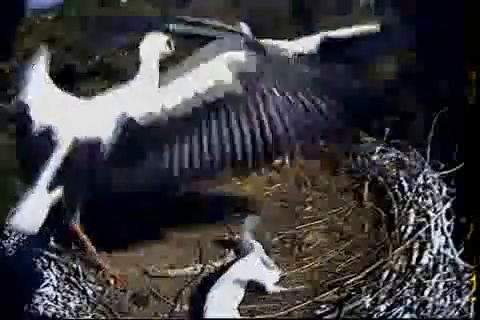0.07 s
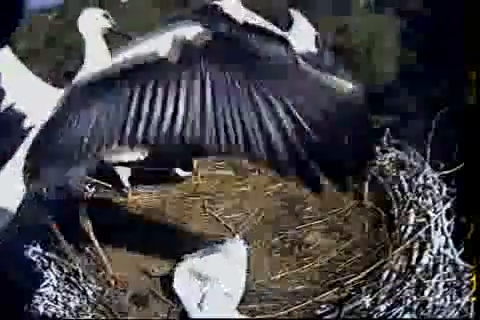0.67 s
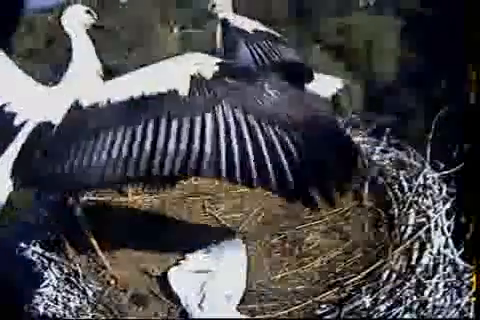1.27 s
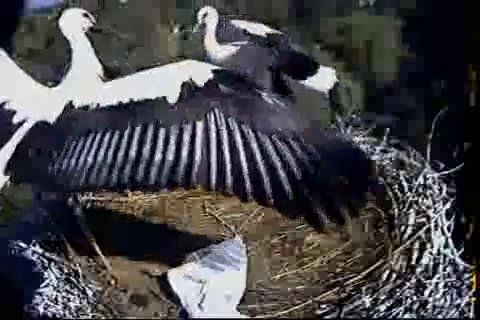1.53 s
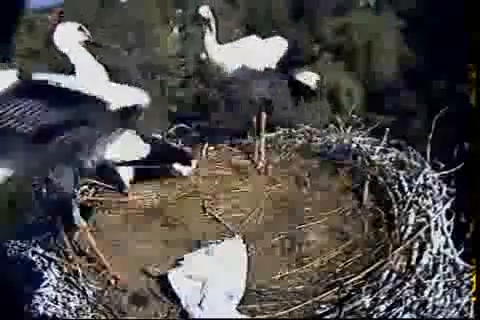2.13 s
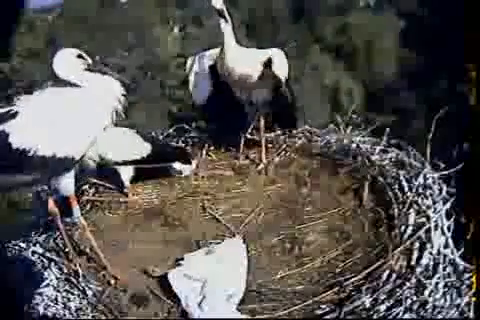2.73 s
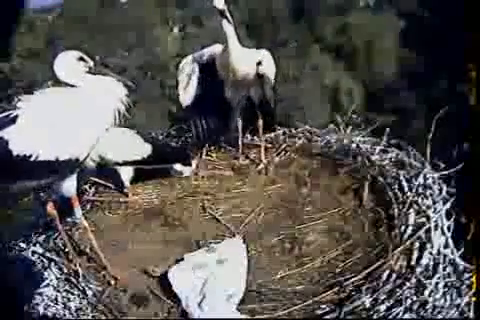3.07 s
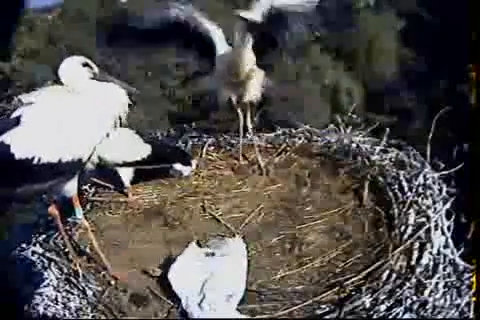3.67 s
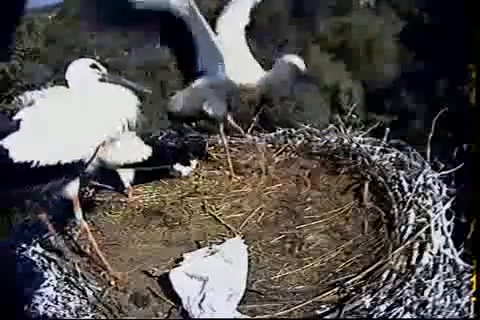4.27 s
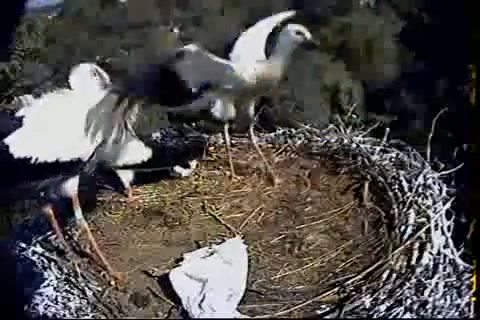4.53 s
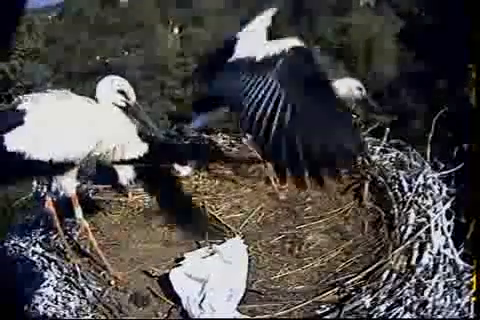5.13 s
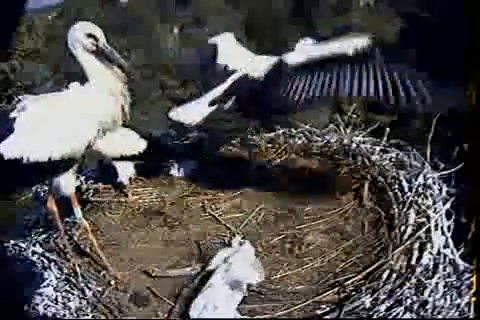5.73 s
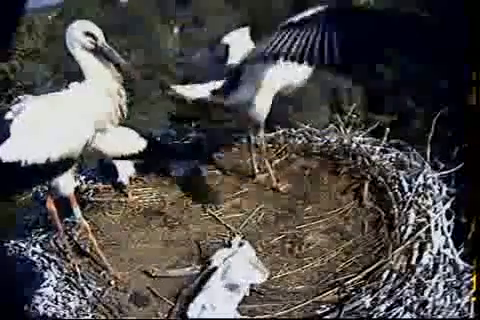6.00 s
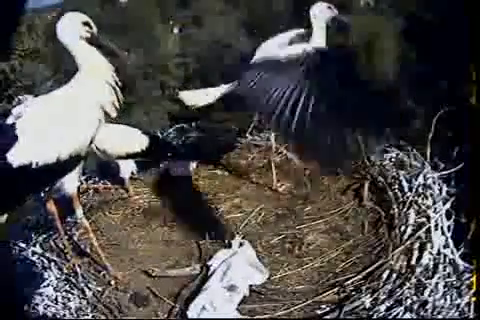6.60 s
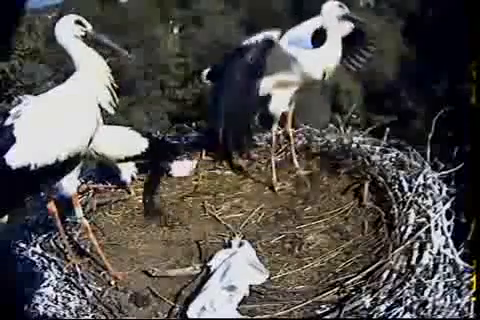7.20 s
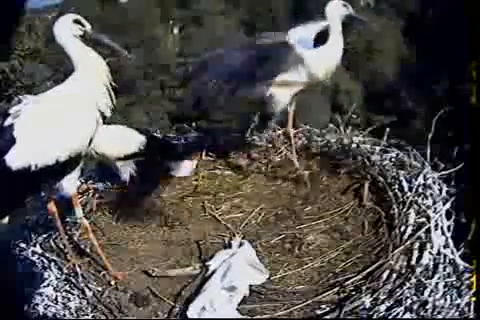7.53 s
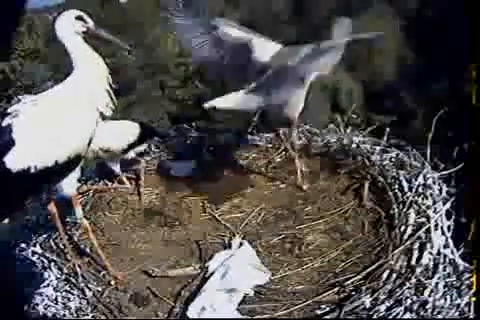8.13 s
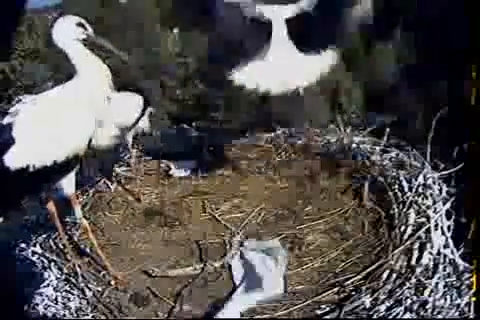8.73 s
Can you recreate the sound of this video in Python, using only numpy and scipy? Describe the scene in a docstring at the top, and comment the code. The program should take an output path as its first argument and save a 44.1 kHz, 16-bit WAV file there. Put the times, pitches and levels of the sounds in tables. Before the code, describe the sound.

Young storks beat their wings in a high twig nest, close to a small microphone. The draught buffets it with low, fluttering thumps, strongest in the first second, then eases to lighter gusts with faint feather swishes. From about 3.6 to 5.2 seconds a bill snaps nine times at an uneven pace, each a loud, hard crack with a short, hollow ring. A brief, soft, hollow rustle falls between the first two snaps. The wing gusts grow again from 5 to about 6.8 seconds, and return more lightly near the end. A foot briefly scrapes the twigs at 8.1 seconds, a dry stick ticks at 8.4, and another tiny hollow rustle comes at 8.7. Soft wind in the trees, a distant low roar and steady microphone hiss lie behind throughout, with a very faint, far-off hum rising around 4 to 6 seconds.

```python
"""A high twig nest, where young storks exercise their wings close to a small fixed microphone.
The draught of the wing beats buffets the microphone, among feather swishes and airy rushes.
A bill snaps nine times, each a hard crack with a short ring of horn and hollow.
Two short, hollow rustles sound, a foot scrapes the twigs, and a stick ticks.
Wind in the trees and a distant low roar with a faint drone lie behind, over the microphone's own hiss."""
import sys
import numpy as np
from scipy import signal
from scipy.fft import rfft, irfft
from scipy.io import wavfile
from scipy.ndimage import uniform_filter1d

SR = 44100
rng = np.random.default_rng(int(sys.argv[2]) if len(sys.argv) > 2 else 0)


def pcm_store(signal):
    """Save signal as 16-bit PCM."""
    levels = np.round(np.clip(np.atleast_2d(signal), -1, 1) * 32767)
    wavfile.write(sys.argv[1], SR, levels.astype(np.int16).T)


N = 386757
TIME = np.arange(N) / SR


def buffeting():
    """Eddies push on the microphone as hard as the draught blows; a big vortex rocks it briefly."""
    # spectrum of the rumble: freq_hz, density_db
    rumble_colour = [(18, -28), (26, -9.5), (36, 1.5), (50, 0.5), (75, -2), (100, -9.5), (135, -15.5),
                     (190, -26.5), (330, -34.5)]
    # single big vortices shed by a wing: centre_s, level_db, rocking_hz
    vortices = [(0.057, -16, 34.2), (.322, -13.5, 57), (0.371, -19, 43.4), (0.596, -15.5, 42.3),
                (0.698, -17, 76.4), (4.984, -21, 36.8), (5.697, -25, 35), (5.811, -26, 38.5),
                (8.479, -28.5, 41.5), (8.584, -39, 54.3)]
    out = draught() * from_db(0.9 * drift(per_s=17)) * evened(coloured_noise(rumble_colour))
    for centre_s, level_db, rocking_hz in vortices:
        cycles = (TIME - centre_s) * rocking_hz
        out += from_db(level_db) * np.exp(-(cycles / 1.2) ** 2) * np.sin(2 * np.pi * cycles)
    return out


def draught():
    """Strength of the moving air: gusts add their power to a slowly slackening breeze."""
    # wing strokes and air reaching the microphone: centre_s, level_db, half_length_s
    gusts = [(0.06, -28.5, 0.043), (.12, -31, .02), (0.178, -24, 0.028), (0.25, -21, 0.031),
             (0.333, -19, 0.021), (0.37, -20, 0.02), (0.44, -24.5, 0.038), (0.533, -21.5, 0.023),
             (0.594, -25, 0.012), (0.647, -29.5, 0.027), (0.703, -22, 0.021), (0.767, -26.5, 0.036),
             (0.886, -28.5, 0.026), (1.01, -38.5, 0.04), (1.13, -36.5, 0.022), (1.41, -38, 0.061),
             (1.767, -39.5, 0.047), (1.938, -35, 0.021), (2.06, -37, .03), (2.17, -35, .03),
             (2.285, -38.5, 0.033), (2.715, -35.5, 0.1), (3.054, -38, 0.068), (3.183, -33, 0.026),
             (3.873, -34.5, 0.027), (4.154, -38, 0.13), (4.35, -33.5, 0.096), (4.985, -31, 0.042),
             (5.095, -34.5, 0.044), (5.22, -32, 0.061), (5.32, -30, 0.039), (5.434, -30, 0.039),
             (5.546, -30.5, 0.044), (5.748, -35.5, 0.07), (5.955, -32.5, 0.046), (6.226, -41, 0.058),
             (6.379, -26.5, 0.027), (6.66, -31, 0.074), (6.8, -34.5, 0.03), (7.045, -36, 0.029),
             (7.56, -41, 0.11), (7.867, -36.5, 0.026), (8.297, -37.5, 0.091), (8.487, -41, 0.023),
             (8.61, -35, 0.084)]
    breeze = from_db(-40.5 - 0.24 * TIME)
    gust_power = sum((from_db(db) * swell(s, half_length)) ** 2 for s, db, half_length in gusts)
    return np.sqrt(breeze ** 2 + gust_power)


def wing_flutters():
    """Small quick eddies off the wing tips flap at the microphone, pitched above the rumble."""
    # flurries of eddies: centre_s, level_db, half_length_s
    flurries = [(.38, -28.5, 0.018), (.6, -35, 0.028), (0.69, -32, 0.026), (3.07, -41.5, .04),
                (4.357, -50, .04), (4.99, -39, .025), (5.503, -39, 0.046), (5.69, -39, 0.016),
                (6.08, -39, 0.045), (6.38, -38, 0.022), (6.75, -46, 0.083), (7.332, -48, 0.052),
                (8.597, -38.5, 0.036)]
    flutter_hz = 115.3
    eddies = evened(band(band(rng.standard_normal(N), flutter_hz, q=2.3), flutter_hz, q=2.3))
    return eddies * sum(from_db(db) * swell(s, half_length) for s, db, half_length in flurries)


def bill_snaps():
    """The mandibles clap; the crack runs along the bill and back, and horn and hollow ring briefly."""
    # claps of the bill: start_s, level_db, crack_hz, cavity_hz, cavity_db, cavity_t60_s, echo_db,
    # flex_hz, flex_db, horn_db, tip_hz, tip_db (the parts' levels are relative to level_db)
    snaps = [(3.6016, -11.5, 2290, 626, -14, 0.035, -27, 1820, -22, -15, 2870, -32),
             (3.7082, -9.5, 2300, 614, -13.5, 0.028, -14, 1690, -22, -8, 2340, -30),
             (4.054, -11, 2430, 658, -9, 0.02, -7, 1620, -13.5, 7.5, 2950, -18),
             (4.21, -11.5, 2430, 675, -11.5, 0.022, -25, 1610, -14.5, 2, 2540, -19),
             (4.3259, -17, 2370, 714, -12, 0.026, -18, 1620, -24, -12, 2710, -25),
             (4.6172, -12, 2650, 694, -10.5, 0.016, -24, 1720, -30, 2, 2100, -31),
             (4.7535, -8.5, 2700, 704, -10.5, 0.011, -26, 1700, -30, -11, 2380, -29),
             (4.8606, -8, 3020, 686, -9.5, 0.0085, -20, 1720, -21, 2, 3700, -27),
             (5.1577, -12, 3020, 740, -10, 0.0096, -14, 1740, -25, 1, 2750, -26)]
    # overtones of the horny mandibles: ratio to flex_hz, level_db, t60_s
    horn_modes = [(1.36, -31, 0.015), (1.72, -21, 0.0069), (2.11, -26, 0.017), (2.9, -45, .008)]
    ratio, mode_db, mode_t60_s = np.transpose(horn_modes)[:, :, None]
    flex_t60_s, tip_t60_s, wash_t60_s = 0.025, 0.018, 0.2
    radiation = signal.butter(2, 450, "high", fs=SR, output="sos")  # a slim body radiates little bass
    out, t = np.zeros(N), TIME[:SR // 10]
    for (start_s, level_db, crack_hz, cavity_hz, cavity_db, cavity_t60_s, echo_db,
         flex_hz, flex_db, horn_db, tip_hz, tip_db) in snaps:
        crack = 0.79 * contact(t, crack_hz, q=0.82, scatter=0.053, scatter_t60_s=0.028)
        round_trip_s = 0.94 / cavity_hz
        echo = from_db(echo_db) * np.interp(t - round_trip_s, t, soften(crack, hz=4500), left=0)
        cavity = ringing(t, cavity_hz, cavity_db, cavity_t60_s)
        flex = ringing(t, flex_hz, flex_db, flex_t60_s)  # the mandibles' slowest bending mode
        tip = ringing(t, tip_hz, tip_db, tip_t60_s)  # the free end, tuned by the point of contact
        # every snap lands a little differently along the bill
        detune, accent = rng.standard_normal((2, len(horn_modes), 1))
        horn_hz = flex_hz * ratio * (1 + 0.0083 * detune)
        horn = ringing(t, horn_hz, mode_db + horn_db + 1.2 * accent, mode_t60_s).sum(axis=0)
        ring = soften(signal.sosfilt(radiation, cavity + flex + tip + horn), hz=5150)
        # a faint wash comes back from the surroundings
        wash = rms_one(band(rng.standard_normal(len(t)), hz=3040, q=0.3))
        wash *= from_db(-34.5 - 60 * t / wash_t60_s)
        add(out, start_s, -from_db(level_db) * (crack + echo + ring + wash))
    return out


def swishes():
    """Soft swells of friction noise: feather swishes, airy rushes and a faint twig rustle."""
    # swells of noise: centre_s, level_db, half_length_s, centre_hz
    swells = [(0.065, -52.5, 0.04, 5440), (0.074, -52, 0.037, 1500), (.65, -59, 0.22, 1600),
              (1.722, -61, .05, 1450), (2.27, -55.5, 0.038, 1450), (3.4, -54.5, 0.031, 4000),
              (3.635, -54, 0.013, 4000), (3.685, -53, .025, 1700), (4.22, -56, 0.044, 6500),
              (4.5, -50, .034, 5200), (4.91, -55, 0.062, 4000), (5.445, -57, 0.074, 4000),
              (5.888, -53, 0.0082, 7000), (8.165, -56.5, 0.15, 2500), (8.53, -54, 0.053, 2470),
              (8.39, -57, .04, 6000), (8.66, -58, 0.091, 5500)]
    out, rub = np.zeros(N), friction(grain_db=2.0, grains_per_s=470)
    for centre_s, level_db, half_length_s, centre_hz in swells:
        swish = rms_one(band(band(rub, centre_hz, q=0.69), centre_hz, q=0.63))
        out += from_db(level_db) * swell(centre_s, half_length_s) * swish
    return out


def hollow_rustles():
    """Two short, hollow rustles near 650 Hz, the first between bill snaps."""
    # short hollow rustles: centre_s, level_db, half_length_s, pitch_hz
    rustles = [(3.67, -43, 0.015, 630), (8.73, -43, .007, 670)]
    out, rub = np.zeros(N), friction(grain_db=2.0, grains_per_s=180)
    for centre_s, level_db, half_length_s, pitch_hz in rustles:
        hollow = rms_one(band(band(rub, pitch_hz, q=7), pitch_hz, q=7))
        out += from_db(level_db) * swell(centre_s, half_length_s) * hollow
    return out


def foot_scrape():
    """Claws catch suddenly and slip in quick little jerks over the twigs."""
    # the stroke of the foot: start_s, level_db, hold_s
    scrapes = [(8.089, -44.5, .021)]
    # resonances of the scraped twigs: pitch_hz, level_db
    twig_modes = [(1200, 2), (2050, 2), (2750, -5)]
    attack_s, release_s = 0.003, 0.012
    out, slips = np.zeros(N), friction(grain_db=1.5, grains_per_s=400)
    twigs = rms_one(sum(from_db(db) * band(band(slips, hz, q=1.9), hz, q=1.9) for hz, db in twig_modes))
    for start_s, level_db, hold_s in scrapes:
        stroke = np.interp(TIME - start_s, np.cumsum([0, attack_s, hold_s, release_s]), [0, 1, 1, 0])
        out += from_db(level_db) * stroke * twigs
    return out


def twig_tick():
    """A dry stick gives way underfoot with a small tick."""
    # the stick giving way: start_s, peak_db
    ticks = [(8.3734, -24.5)]
    out = np.zeros(N)
    for start_s, peak_db in ticks:
        tick = contact(TIME[:SR // 50], hz=1300, q=0.6, scatter=0.2, scatter_t60_s=0.0052)
        add(out, start_s, from_db(peak_db) * tick)
    return out


def distant_roar():
    """A low, wavering roar, hollowed by its echo off the ground."""
    # spectrum of the roar: freq_hz, density_db
    roar_colour = [(80, -5), (150, 1), (195, -2), (265, -4), (340, -4), (480, -5), (720, -7.5),
                   (1100, -14.5), (2500, -36.5)]
    # its slow rise and fall: time_s, level_db
    roar_levels = [(1.2, -47), (3.27, -49), (5.2, -47), (6.1, -45.5), (6.64, -44.5), (7.3, -45),
                   (7.7, -45.5), (8.77, -47)]
    # how far the ground echo trails: time_s, lag_s
    ground_lag = [(3.0, 0.00394), (5.8, 0.00366), (6.6, 0.00411), (8.5, 0.00421)]
    direct = coloured_noise(roar_colour)
    echo = from_db(-17) * np.interp(TIME - in_time(ground_lag), TIME, direct)
    return from_db(in_time(roar_levels) + 0.81 * drift(per_s=9)) * rms_one(direct + echo)


def wind_in_trees():
    """Wind rushes softly through the trees, wavering a little."""
    # spectrum of the rush: freq_hz, density_db
    trees_colour = [(300, -20.5), (700, -4), (1050, 0), (1600, -2), (2300, -8.5), (4000, -14), (9000, -23)]
    # its slow rise and fall: time_s, level_db
    wind_levels = [(0.0, -50.5), (0.66, -49), (1.2, -50), (1.63, -50), (2.0, -51.5), (2.44, -51),
                   (2.83, -52), (5.13, -50.5), (6.28, -54), (6.55, -50), (6.94, -53), (8.77, -52)]
    return from_db(in_time(wind_levels) + 0.58 * drift(per_s=5.4)) * coloured_noise(trees_colour)


def drone():
    """A faint, unsteady, far-off hum swells and fades as it climbs."""
    # the hum's glide: time_s, pitch_hz
    glide = [(3.7, 217.6), (4.15, 256), (4.8, 284), (6.1, 286)]
    phase = 2 * np.pi * np.cumsum(in_time(glide) + 5 * drift(per_s=25)) / SR
    level = from_db(-59.5 + 1.6 * drift(per_s=7.3)) * swell(centre_s=4.7, half_length_s=1)
    return level * np.sqrt(2) * np.sin(phase)


def microphone_hiss():
    """The microphone's own steady noise floor."""
    # spectrum of the hiss: freq_hz, density_db
    hiss_colour = [(200, 5.5), (2000, 3.5), (4000, 1), (7000, -1), (9300, -2.5), (10500, -9.5)]
    return from_db(-52.5) * coloured_noise(hiss_colour)


def contact(t, hz, q, scatter, scatter_t60_s):
    """One hard pulse of height 1, trailed by its scatter from the twigs close by."""
    pulse = scatter * rng.standard_normal(len(t)) * from_db(-60 * t / scatter_t60_s)
    pulse[0] = 1
    crack = soften(band(pulse, hz, q), hz=6250)
    return crack / np.abs(crack).max()


def ringing(t, hz, level_db, t60_s):
    """One struck mode dying away."""
    return from_db(level_db - 60 * t / t60_s) * np.cos(2 * np.pi * hz * t)


def friction(grain_db, grains_per_s):
    """Rubbing noise, roughened by a fast flicker in level."""
    return rng.standard_normal(N) * from_db(grain_db * drift(grains_per_s))


def coloured_noise(points):
    """Unit noise with the given spectrum, falling away beyond its ends."""
    hz, db = np.transpose(points)
    bin_hz = np.maximum(np.fft.rfftfreq(N, 1 / SR), 1)
    skirts = np.minimum(bin_hz / hz[0], 1) ** 2 * np.minimum(hz[-1] / bin_hz, 1) ** 2
    colour = from_db(np.interp(np.log(bin_hz), np.log(hz), db))
    return rms_one(irfft(rfft(rng.standard_normal(N)) * skirts * colour, N))


def drift(per_s):
    """Smooth random wandering of spread 1."""
    knots = rng.standard_normal(N)
    return rms_one(np.interp(TIME * per_s, np.arange(N), knots))


def swell(centre_s, half_length_s):
    """A bell-shaped rise and fall of height 1."""
    return np.exp(-.5 * ((TIME - centre_s) / half_length_s) ** 2)


def in_time(points):
    """An automation curve through (time_s, value) points."""
    return np.interp(TIME, *np.transpose(points))


def band(x, hz, q):
    """One band-pass resonance."""
    w = 2 * np.pi * min(hz, SR / 2 - 1000) / SR
    damping = np.sin(w) / (2 * q)
    return signal.lfilter([damping, 0, -damping], [1 + damping, -2 * np.cos(w), 1 - damping], x + 1e-18)


def soften(x, hz):
    """Gentle treble roll-off."""
    return signal.sosfilt(signal.butter(2, hz, fs=SR, output="sos"), x)


def evened(x):
    """Hold a noise at unit power from one twentieth of a second to the next."""
    return x / np.sqrt(uniform_filter1d(uniform_filter1d(x ** 2, size=2400), size=2400) + 1e-20)


def rms_one(x):
    """Scale to unit power."""
    return x / np.sqrt(np.mean(x ** 2) + 1e-20)


def from_db(db):
    """Decibels to gain."""
    return 10 ** (np.asarray(db) / 20)


def add(out, start_s, sound):
    """Mix a sound in at its cue."""
    start = int(round(start_s * SR))
    out[start:start + len(sound)] += sound[:N - start]


def scene():
    """Birds, moving air, the distance and the microphone's hiss, in one channel."""
    hiss = microphone_hiss()
    birds = bill_snaps() + twig_tick() + foot_scrape() + hollow_rustles() + swishes()
    air = buffeting() + wing_flutters()
    distance = distant_roar() + wind_in_trees() + drone()
    return (birds + air + distance + hiss)[None]


def record(dry):
    """A steep low-pass cuts the top."""
    cutoff_hz = 10050
    taps = signal.firwin(301, cutoff_hz, fs=SR, window=("kaiser", 8))
    return signal.fftconvolve(dry, taps[None], "same", axes=1)


dry = scene()
out = record(dry)
pcm_store(out)
```